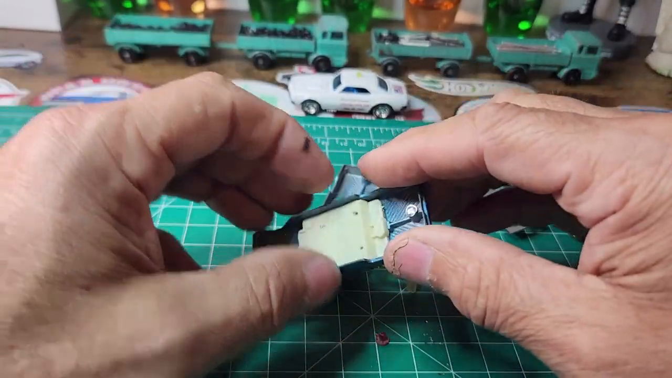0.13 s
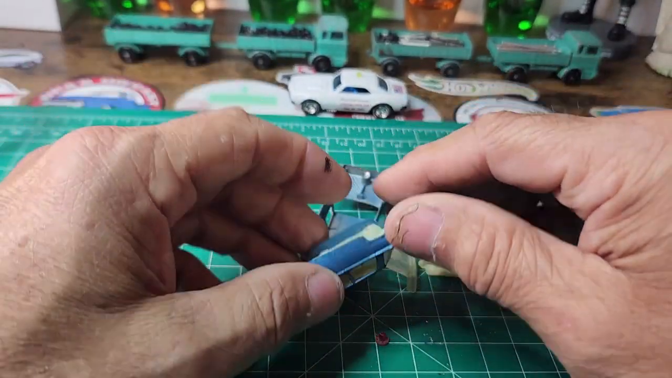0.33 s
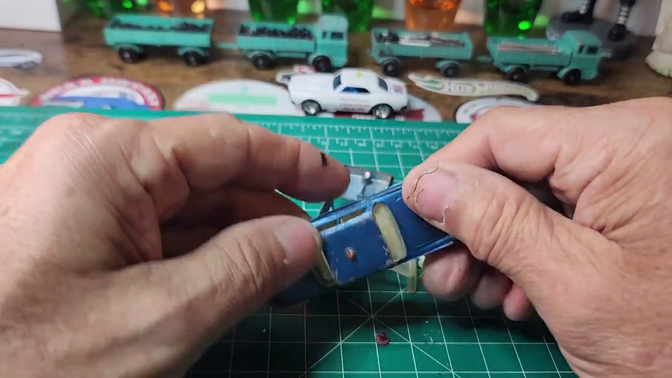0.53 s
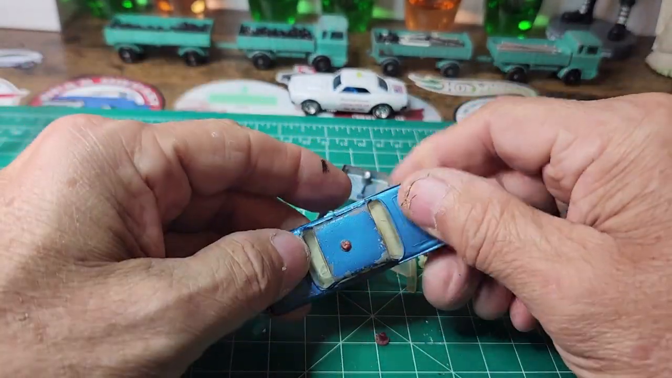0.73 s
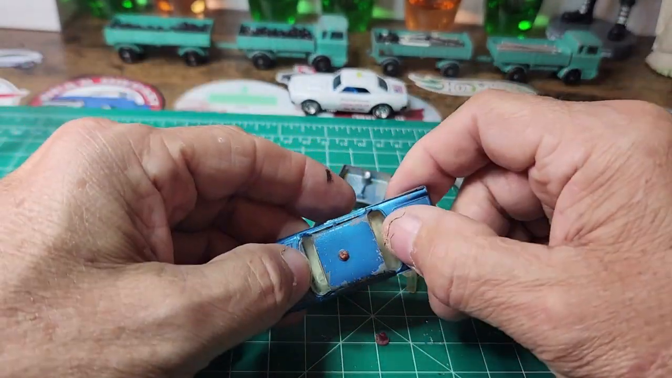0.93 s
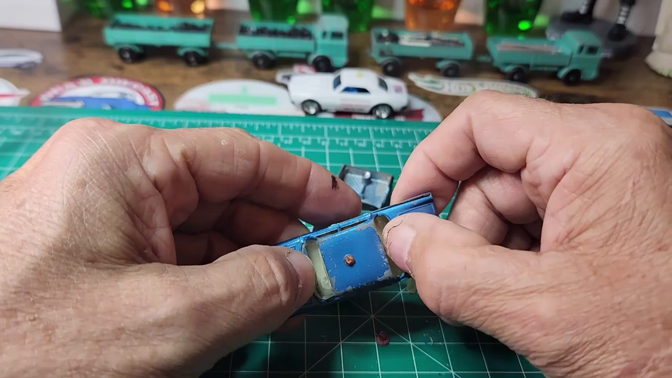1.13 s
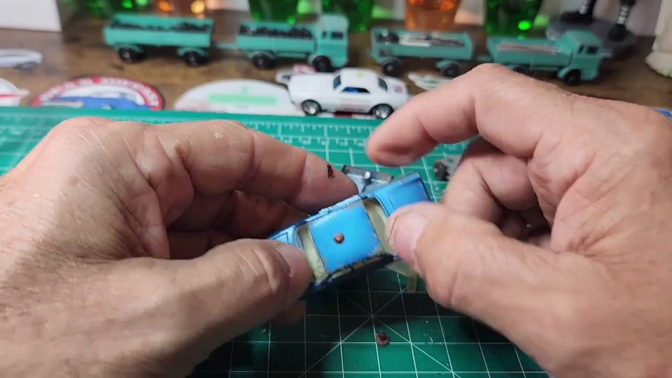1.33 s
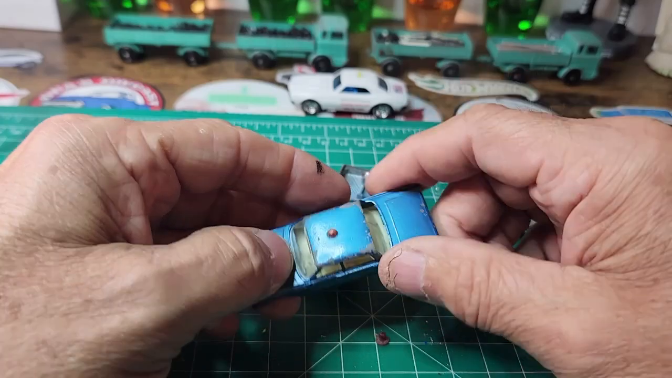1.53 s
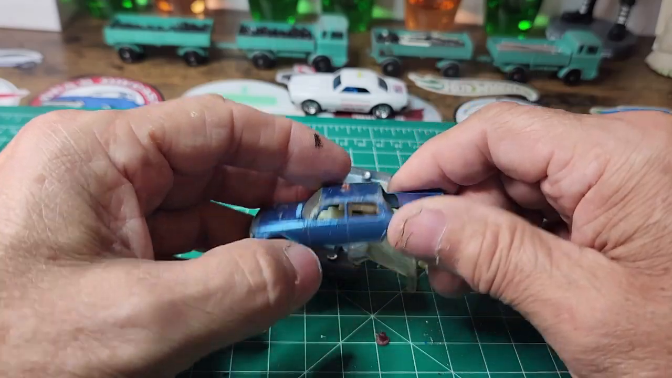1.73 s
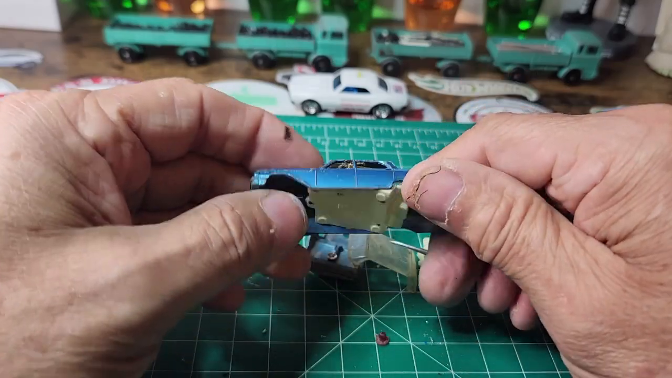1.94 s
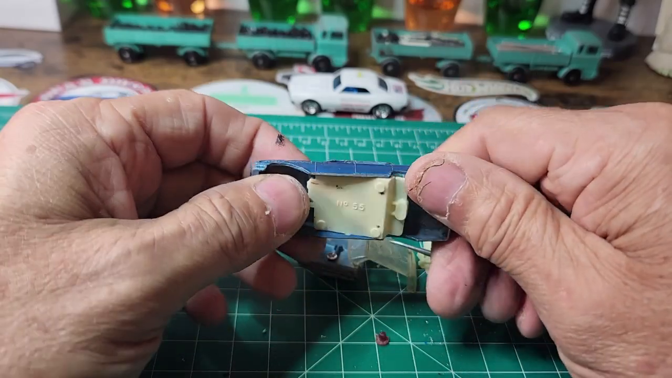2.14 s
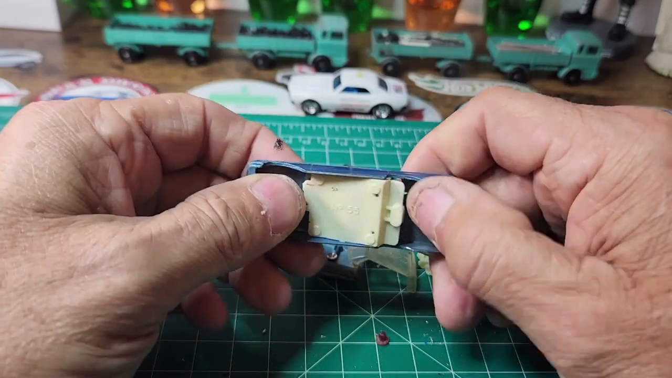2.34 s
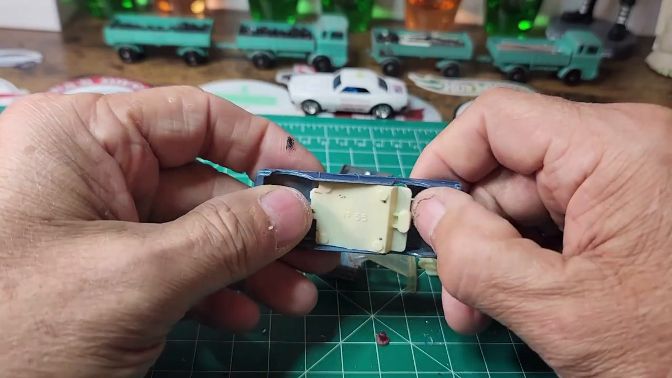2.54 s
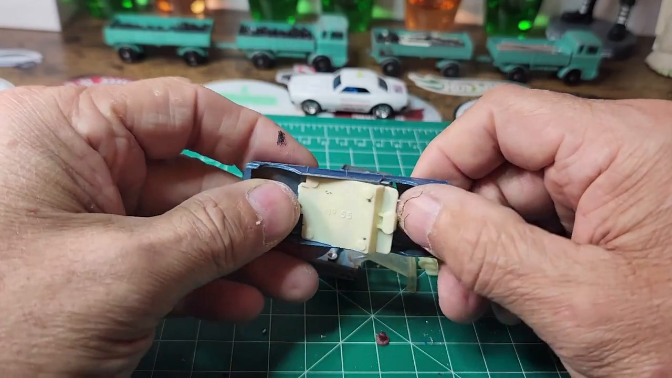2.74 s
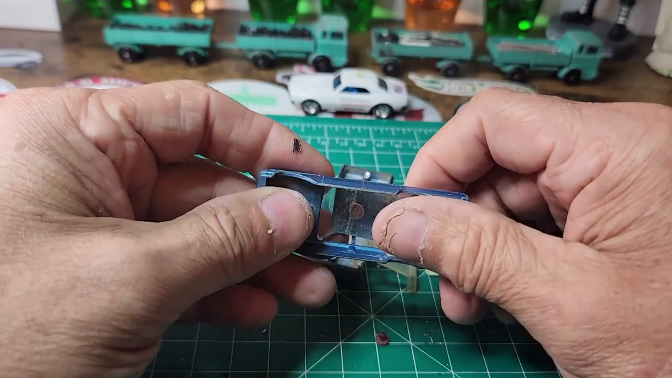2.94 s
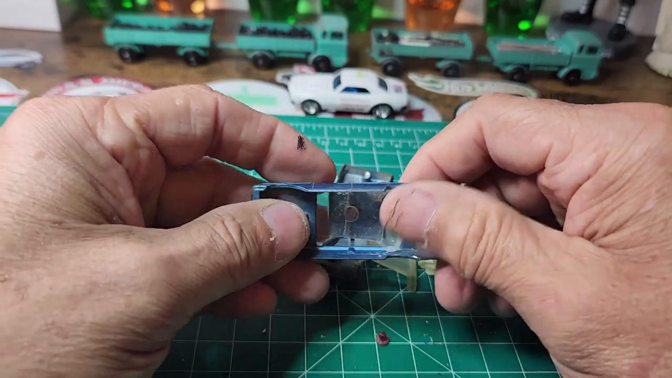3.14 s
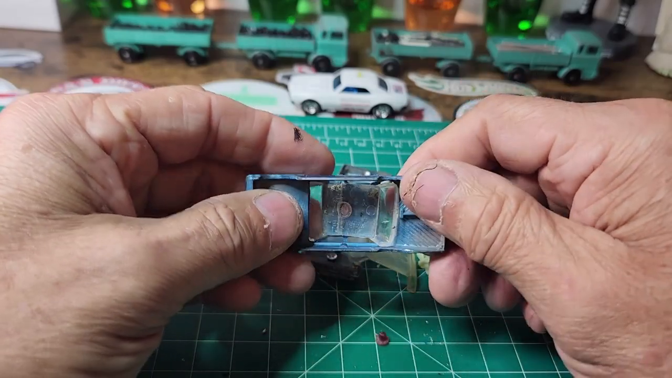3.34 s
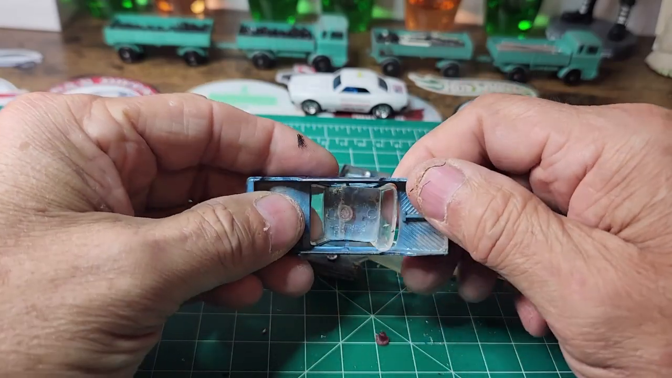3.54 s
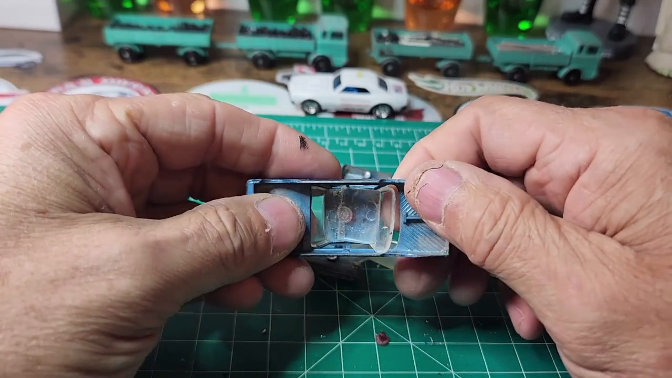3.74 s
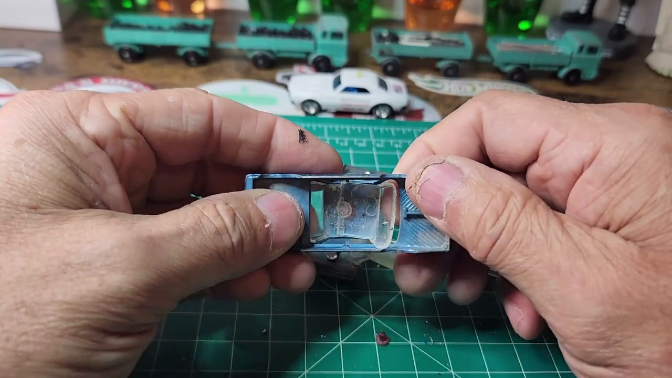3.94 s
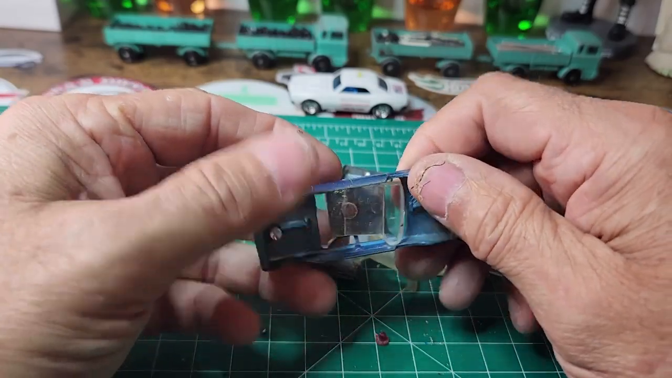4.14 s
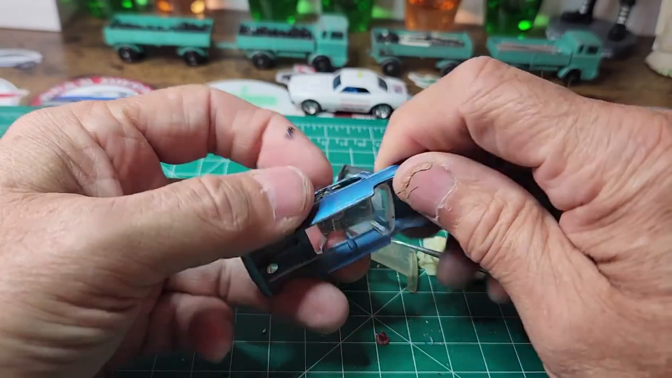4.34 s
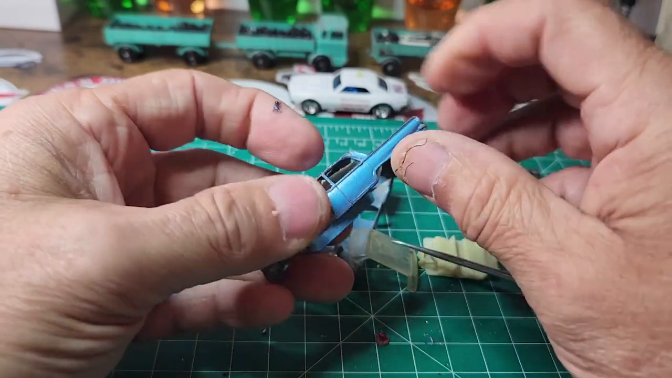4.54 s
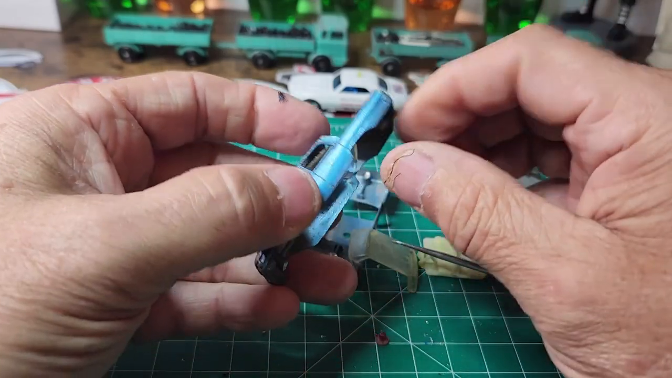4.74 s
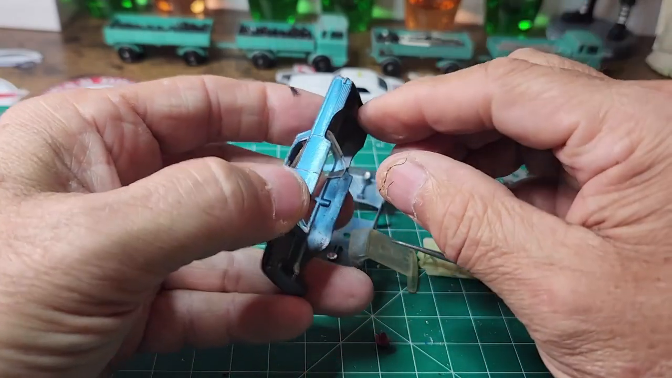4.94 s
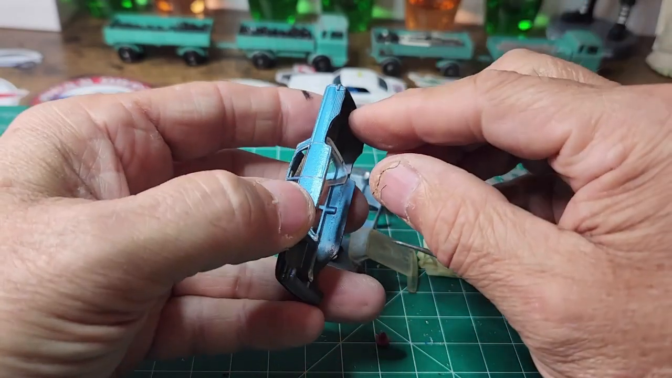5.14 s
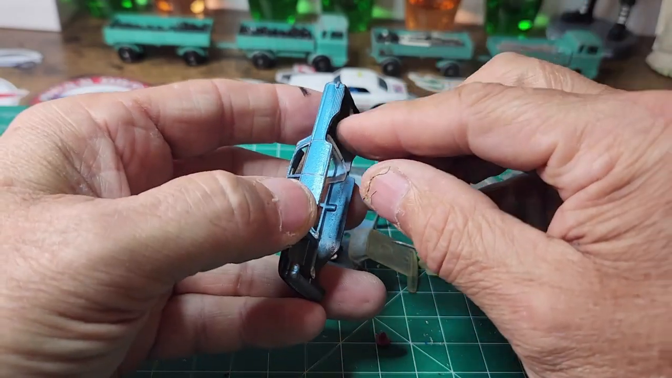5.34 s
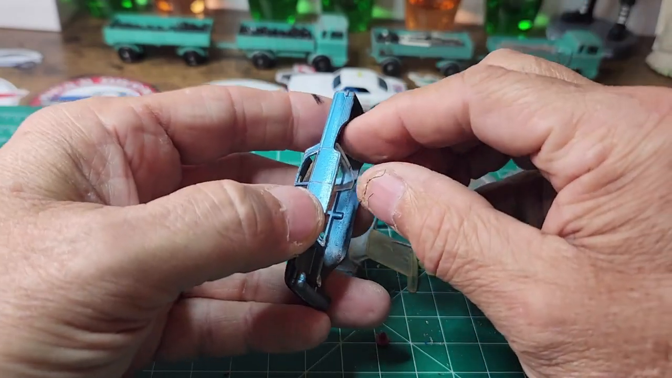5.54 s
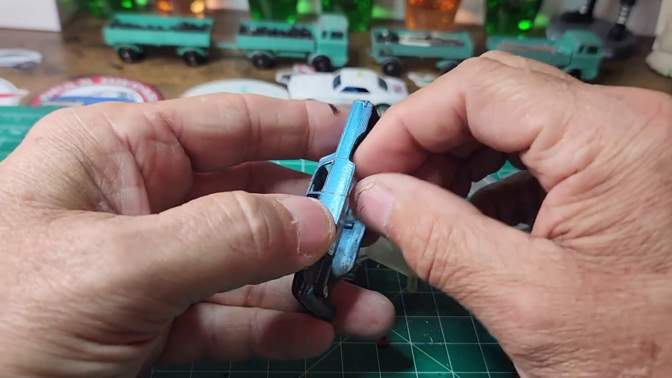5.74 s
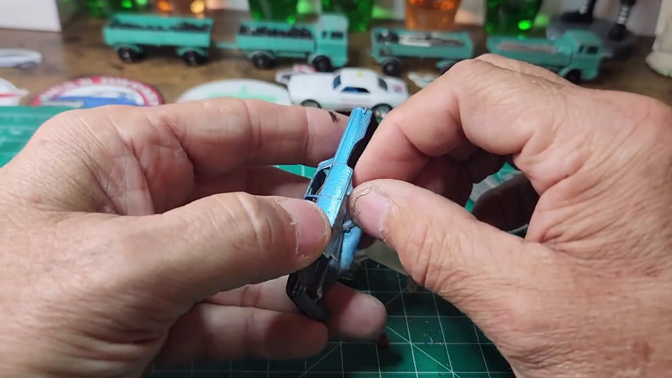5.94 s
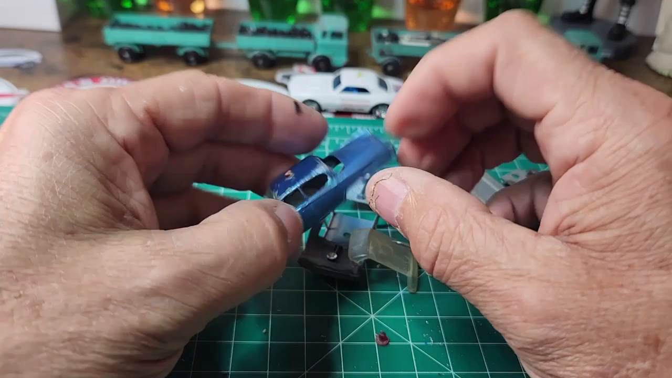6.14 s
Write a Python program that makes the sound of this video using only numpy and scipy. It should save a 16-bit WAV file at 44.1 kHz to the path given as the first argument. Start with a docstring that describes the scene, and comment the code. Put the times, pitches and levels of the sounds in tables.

```python
"""Skin hisses along the metal shell of a small toy car, turned by hands close to a two-port microphone: grains of
noise excite the shell's damped resonances. Loose parts tick against it, each a short burst through resonators.
A plastic insert snaps free, drops on the desk mat, bounces and chatters as it settles; short, mostly low swells
in the desk rumble are decaying sines. A small room answers the contacts with noise tails and hums with
ventilation: shaped noise, narrow motor tones and a swelling desk rumble."""
import sys
import numpy as np
from scipy import signal
from scipy.fft import rfft, irfft, next_fast_len
from scipy.io import wavfile
from scipy.ndimage import uniform_filter1d, map_coordinates

SR = 44100
rng = np.random.default_rng(int(sys.argv[2]) if len(sys.argv) > 2 else 0)


def voltage_ratio(decibels):
    """Convert decibels (scalar or array-like) to amplitude ratios, 20 dB per decade."""
    exponent = np.asarray(decibels, float) / 20
    return 10 ** exponent


def digitize_waveform(pressure):
    """Quantize a signal to 16-bit integers and store it at the path in sys.argv[1].

    Rows of a 2-D input are taken as channels; values are limited to [-1, 1].
    """
    field = np.atleast_2d(pressure).T
    bounded = np.clip(field, -1, 1)
    quanta = np.round(bounded * 32767).astype(np.int16)
    wavfile.write(sys.argv[1], SR, quanta)


N = 272802

# Resonances of the metal shell. Each row: frequency in Hz, width in Hz before added damping, relative level in dB.
SHELL_MODES = [(4700, 300, -3), (6150, 250, -1), (6800, 120, -4), (7380, 120, -2), (7900, 120, -4),
               (8600, 150, -1), (9150, 120, -6), (9880, 130, -2), (10600, 250, -4), (11500, 250, -3),
               (12600, 350, -7), (13700, 250, -8), (14700, 300, -8)]
# Resonances of the plastic insert. Each row: frequency in Hz, width in Hz before added damping, relative level in dB.
INSERT_MODES = [(2400, 230, -13), (3500, 300, 0.5), (4010, 460, -3.5), (5760, 400, -8.5), (6500, 520, -2),
                (7300, 400, -1.5), (8300, 550, -6), (9450, 550, -1.5), (10900, 500, -1.5), (12020, 700, -9),
                (14100, 830, -9)]


def unit(x):
    """Normalization of signal power: scale to rms 1."""
    return x / np.sqrt(np.mean(x ** 2) + 1e-20)


def along(points, hz):
    """Logarithmic frequency scale: (Hz, value) points are joined by straight lines on it."""
    f, v = np.transpose(points)
    return np.interp(np.log(hz + 1), np.log(f + 1), v)


def wobble(rate):
    """Slow random modulation: a smooth curve through random knots, rate of them a second."""
    knots = rng.standard_normal(int(N * rate / SR) + 4)
    return map_coordinates(knots, [np.arange(N) * rate / SR])


def filtered(x, response):
    """Linear filtering: the spectrum is multiplied by a complex response of frequency."""
    m = next_fast_len(x.shape[-1] + 8192)
    spectrum = rfft(x, m) * response(np.fft.rfftfreq(m, 1 / SR))
    return irfft(spectrum, m)[..., :x.shape[-1]]


def mode(f, hz, width):
    """Damped resonance: the causal response of one oscillator, with gain 1 at its peak."""
    return 1j * f * width / (hz * hz - f * f + 1j * f * width)


def rush(response, alike):
    """Partial coherence: stereo noise of rms 1 whose mid and side shares set the channel likeness."""
    def shares(hz):
        turn = np.arccos(np.clip(along(alike, hz), -1, 1)) / 2
        return np.array([np.cos(turn), np.sin(turn)])
    noise = rng.standard_normal((2, N))
    mid, side = filtered(noise, lambda hz: response(hz) * shares(hz))
    return unit(np.array([mid + side, mid - side]))


def patchy(x, patchy_db):
    """Time-frequency modulation: random patches of gain, some hundred Hz wide and some ten ms long."""
    z = signal.stft(x, nperseg=256)[2]
    field = rng.standard_normal(z.shape[1:])
    field = uniform_filter1d(field, size=5, axis=0)
    field = uniform_filter1d(field, size=12, axis=1)
    return signal.istft(z * voltage_ratio(patchy_db * unit(field)), nperseg=256)[1][:, :N]


def ports(x, pan_db, lead):
    """Level and time difference between ports: the right one hears a near source lead seconds later."""
    right = filtered(x[1], lambda hz: np.exp(-2j * np.pi * hz * lead))
    return np.array([x[0] * voltage_ratio(pan_db / 2), right * voltage_ratio(-pan_db / 2)])


def contacts(rows, body, body_db, spread, ring_db, pan_db):
    """Impact excitation: a sharp blow with a rough after-scrape rings its own spot, the body and the desk."""
    # The desk under the mat. Each row: frequency in Hz, width in Hz, relative level in dB.
    mat_modes = [(745, 270, -5), (1086, 130, 0.5), (1700, 500, -5), (2840, 630, 3)]
    lead = 6.2 / SR  # s, the hands are nearer the left port
    out, t = np.zeros((2, N + SR)), np.arange(2048) / SR

    def soft(f):  # contact time rounds off the treble
        return 1 / (1 + 1j * f / 9000) ** 2

    def desk(f):
        return sum((-1) ** k * voltage_ratio(level) * mode(f, c, w) for k, (c, w, level) in enumerate(mat_modes))

    for s, db, hz, knock_db, t60 in rows:
        burst = rng.standard_normal(len(t)) * voltage_ratio(-60 * t / t60) * (1 - np.exp(-t / (0.064 * t60)))
        burst[0] = 0.016 / t60  # the shorter the contact, the more it is one blow
        # each contact excites the modes anew, and each port faces the part differently
        shared_db = rng.normal(0, 2, (len(body), 1, 1))
        port_db = rng.normal(0, 3, (len(body), 2, 1))
        held = voltage_ratio(body_db + shared_db + port_db)

        def rings(f):
            return sum((-1) ** k * gain * voltage_ratio(level) * mode(f, c, w + spread)
                       for k, ((c, w, level), gain) in enumerate(zip(body, held)))

        def struck(f):
            spot = mode(f, hz, 5.6 / t60) + voltage_ratio(ring_db) * mode(f, hz, 170)
            return soft(f) * (spot + rings(f))

        click = filtered(burst, struck)
        knock = filtered(burst, desk)
        sound = click / np.abs(click).max() + voltage_ratio(knock_db + 7.0) * knock / np.abs(knock).max()
        placed = ports(sound, pan_db + rng.normal(), lead * rng.uniform(.9, 1.15))
        out[:, round(s * SR):][:, :len(t)] += voltage_ratio(db) * placed
    return out[:, :N]


def taps():
    """Modal excitation by impact: parts knock the shell, the insert falls, and faint ticks ring the shell."""
    # Parts knock the shell. Each row: start in seconds, click level in dB, strongest ring in Hz,
    # desk knock in dB before a common gain, burst decay time over 60 dB in seconds.
    shell_knocks = [(0.8416, -52.5, 5940, -11, 0.014), (0.8898, -28.5, 6040, -12.5, 0.0052),
                    (0.9231, -37, 6100, -19, 0.0089), (0.9312, -39.5, 2800, -8.5, 0.0099),
                    (0.9506, -33.5, 11050, -15.5, 0.025), (1.0102, -56, 6500, -11, 0.014),
                    (1.0766, -31.5, 9920, -19, 0.008), (1.09, -45, 6240, -9, 0.0073),
                    (1.1018, -38.5, 13000, -18.5, 0.0059), (1.1054, -43, 4470, -12, 0.008),
                    (1.126, -37.5, 12600, -30, 0.007), (1.1305, -44, 6900, -19, 0.0062),
                    (1.1695, -39.5, 9500, -19, 0.007), (1.2178, -44, 5600, -16, 0.007),
                    (1.2885, -52.5, 1430, -11, 0.013), (1.2955, -39.5, 5720, -10, 0.023),
                    (2.6997, -37, 4800, -25.5, 0.016), (2.7796, -24, 3030, -17.5, 0.011),
                    (2.823, -35.5, 7300, -9.5, 0.008), (3.4755, -53, 8120, -16, 0.015),
                    (3.509, -51, 9880, -12, 0.081), (4.0936, -44, 6040, -18, 0.022),
                    (4.778, -39.5, 4490, -28, 0.02), (5.256, -56, 4930, -22, 0.045),
                    (5.5889, -42.5, 8600, -16.5, 0.0143), (5.6869, -31, 10400, -19, 0.008),
                    (5.6895, -38, 8300, -15, 0.016), (5.691, -41.5, 2820, -14, .015),
                    (5.7225, -27, 8680, -17.5, 0.012), (5.7235, -43, 2120, -19, 0.048),
                    (5.7273, -28, 11200, -31, 0.008), (5.7295, -29, 8700, -24.5, .022),
                    (5.732, -45, 2782, -20, 0.04), (5.7425, -38, 6500, -23, 0.021),
                    (5.7657, -39.5, 2760, -38.5, 0.026), (5.7813, -39, 8470, -34, 0.0094),
                    (5.8108, -44.5, 8240, -19.5, 0.024), (6.1424, -42.5, 8000, -16, 0.026)]
    # The insert snaps free, lands and bounces. Each row: start in seconds, click level in dB,
    # strongest ring in Hz, desk knock in dB before a common gain, burst decay time over 60 dB in seconds.
    insert_drop = [(2.9015, -24.5, 5863, -20, 0.0022), (2.9031, 0, 4293, -25, 0.0065),
                   (2.9060, 1, 6590, -23.5, 0.0026), (2.9092, -22.5, 6800, -20, 0.0073),
                   (2.9895, -24.5, 3570, -14, 0.0097), (2.9939, -31, 3552, -16.5, 0.0058),
                   (3.0057, -17, 3490, -17.5, 0.0061), (3.0094, 1.5, 7820, -23.5, 0.00092),
                   (3.0125, -23.5, 6500, -17, 0.009), (3.0205, -27, 7200, -12, 0.0034),
                   (3.0530, -21.5, 3910, -16.5, 0.0054), (3.0655, -16, 3895, -19.5, 0.0025),
                   (3.0672, -21, 6500, -16.5, 0.0075), (3.0855, -23, 6000, -14.5, 0.003),
                   (3.0975, -34, 3510, -12, 0.008)]
    # A faint, nearly even ticking. Each row: start in seconds, click level in dB.
    faint_ticks = [(0.1238, -51.5), (4.567, -66), (4.7145, -62), (4.795, -58.5), (4.858, -60), (4.935, -65),
                   (5.08, -59), (5.1477, -59.5), (5.229, -59), (5.3113, -60)]
    ticks = [(s, db, 7650, -40, .007) for s, db in faint_ticks]
    knocking = contacts(shell_knocks, SHELL_MODES, -12.0, 290, ring_db=-1.5, pan_db=5)
    falling = contacts(insert_drop + rattle(), INSERT_MODES, -2, 500, ring_db=-18, pan_db=3.25)
    ticking = contacts(ticks, SHELL_MODES, -2, 400, ring_db=7, pan_db=-0.5)
    return knocking + falling + ticking


def rattle(count=50):
    """Loss of energy in repeated impacts: random contacts of the settling insert tend to weaken with time."""
    start_s, end_s = 2.911, 3.11
    loudest_db, fade_db, knock_db, t60_s = -24.5, 11.5, -15, 0.0037
    when, size, pick = rng.random((count, 3)).T
    when = when ** 1.2  # denser at the start
    level_db = loudest_db - fade_db * (when + size)
    rows = []
    for w, db, p in zip(when, level_db, pick):
        hz = INSERT_MODES[1 + int(p * len(INSERT_MODES) / 2)][0]  # one of the lower modes
        rows.append((start_s + (end_s - start_s) * w, db, hz, knock_db, t60_s))
    return rows


def rubbing():
    """Friction noise with selective damping: skin slides in fine grains; the grip frees rings near one pitch."""
    # Friction spectrum. Each row: frequency in Hz, relative level in dB per Hz.
    skin_spectrum = [(1500, -120), (2500, -20.5), (4500, -7), (6200, -5.5), (8000, -8), (15000, -10),
                     (17000, -23)]
    level_db, ring_hz = strokes()
    free_hz = uniform_filter1d(ring_hz, size=600)  # a grip holds, then changes quickly
    grain = voltage_ratio(1.1 * wobble(500) + 0.97 * wobble(70)) * rng.standard_normal((2, N))
    skin = unit(filtered(grain, lambda f: voltage_ratio(along(skin_spectrum, f))))
    skin = patchy(skin, patchy_db=4.5)
    high = filtered(skin, lambda f: 1 / (1 + (8000 / (f + 1)) ** 4))
    tilt_db = 7 * np.log2(free_hz / 7500)  # a higher ring comes with a brighter hiss
    sound = voltage_ratio(tilt_db) * high + voltage_ratio(-tilt_db) * (skin - high)
    for hz, width, db in SHELL_MODES:
        octaves_off = np.abs(np.log2(free_hz / hz))
        freed_db = -70 * np.minimum(octaves_off, .17) + 2.8 * wobble(18)
        freed_db += .6 * np.minimum(level_db + 80, 0)  # a light touch hardly rings the shell
        ring = unit(filtered(grain, lambda f: mode(f, hz, width + 95) ** 2))
        sound += voltage_ratio(db - 1.5 + freed_db) * ring
    loud = np.sqrt(np.abs(uniform_filter1d(np.mean(sound ** 2, 0), size=2000)))
    return voltage_ratio(level_db) * voltage_ratio([[1.2], [-1.2]]) * sound / loud


def strokes():
    """Dominance of the strongest excitation: the loudest stroke of the moment sets level and freed ring."""
    # Fingers slide along the shell. Each row: time of the maximum in seconds, level there in dB,
    # swell and fade in seconds over 20 dB, best-freed ring in Hz.
    slides = [(0.057, -64.5, 0.28, 0.1, 4700), (.554, -54.5, 0.11, 0.074, 7450),
              (.655, -62, 0.058, 0.17, 6090), (.74, -65.5, 0.36, 0.18, 7700),
              (1.085, -59.5, 0.057, 0.029, 9300), (1.16, -66, 0.11, 0.11, 9370),
              (1.205, -53.5, 0.021, 0.068, 10900), (1.303, -58, 0.12, 0.068, 5370),
              (1.518, -67.5, 0.17, 0.2, 4700), (1.76, -68.5, 0.1, 0.099, 11500),
              (1.847, -69.5, 0.086, 0.044, 8600), (1.981, -65, 0.14, 0.022, 5770),
              (2.29, -58.5, 0.21, 0.15, 7270), (2.45, -76, 0.22, 0.87, 6900),
              (2.576, -64, 0.032, 0.05, 6900), (3.17, -52.5, 0.097, 0.091, 7070),
              (3.403, -59.5, 0.2, 0.1, 6137), (3.572, -54, 0.019, 0.091, 10220),
              (4.045, -57.5, 0.065, 0.094, 6014), (4.279, -65.5, 0.2, 0.18, 6800),
              (4.529, -69.5, 0.3, 0.15, 6240), (4.637, -67.5, 0.039, 0.058, 4700),
              (4.973, -64.5, 0.095, 0.13, 4700), (5.415, -79, 0.061, 0.094, 4680),
              (5.815, -59, 0.1, 0.054, 8560), (6.04, -60.5, 0.08, 0.29, 7000),
              (6.13, -50, 0.044, 0.042, 9700)]
    # A fingertip loses its grip and skids. Each row: time of the maximum in seconds, level there in dB,
    # fade in seconds over 20 dB, best-freed ring in Hz.
    slips = [(.895, -64, 0.7, 6460), (1.895, -61, 0.04, 7540), (2.685, -61.5, 0.12, 6400),
             (2.781, -53, 0.12, 7300), (4.102, -53, 0.01, 6190), (4.443, -66, 0.4, 6200),
             (4.783, -74.5, 0.7, 8600), (5.673, -50.5, 0.11, 9900), (5.7245, -44, 0.0948, 8600)]
    slip_swell_s, resting_db = 0.0068, -87.5  # a slip starts at once; still fingers
    rounded, pointed = 1.2, 1  # exponents of the stroke's top
    t = np.arange(N) / SR
    level_db, ring_hz = np.full(N, resting_db), np.full(N, 7500.)
    rows = [row + (rounded,) for row in slides]
    rows += [(s, db, slip_swell_s, fade, hz, pointed) for s, db, fade, hz in slips]
    for s, db, swell, fade, hz, bend in rows:
        distance = np.maximum(s - t, 0) / swell + np.maximum(t - s, 0) / fade
        stroke_db = db - 20 * distance ** bend
        ring_hz = np.where(stroke_db > level_db, hz, ring_hz)
        level_db = np.maximum(stroke_db, level_db)
    return level_db, ring_hz


def low_swells():
    """Damped oscillation: each short swell in the desk rumble is a sine that rises once and decays."""
    # Short, mostly low swells. Each row: start in seconds, relative level in dB, frequency in Hz.
    swell_rows = [(1.288, -36, 146), (1.291, -38.5, 640), (1.635, -41, 54.7), (1.685, -43, 54.3),
                  (1.852, -36.5, 64.4), (2.119, -34.5, 60), (2.23, -39.5, 55), (2.857, -40, 60),
                  (2.974, -37, 61), (3.06, -39, 53.6), (3.349, -40, 60)]
    out, t = np.zeros(N + SR), np.arange(SR // 8) / SR
    for s, db, hz in swell_rows:
        cycles = hz * t
        envelope = 2 * cycles * np.exp(-1.3 * cycles)
        out[round(s * SR):][:len(t)] += voltage_ratio(db) * envelope * np.sin(2 * np.pi * cycles)
    return out[:N] * voltage_ratio([[2], [-2]])


def room(x):
    """Reverberant decay: each frequency dies at its own speed; every stretch of sound meets a new tail."""
    # Reverberation. Each row: frequency in Hz, decay time over 60 dB in seconds.
    decay_times = [(500, 0.26), (1600, 0.3), (2800, .17), (4200, 0.19), (11000, 0.12)]
    out, step = np.zeros((2, N + SR)), SR // 10
    for start in range(0, N, step):
        hz, t, z = signal.stft(rng.standard_normal((2, SR // 4)), SR, nperseg=256)
        decay = voltage_ratio(-60 * t / along(decay_times, hz)[:, None])
        tail = signal.istft(z * decay, SR, nperseg=256)[1]
        wet = signal.fftconvolve(x[:, start:start + step], tail / np.linalg.norm(tail[0]), axes=1)
        out[:, start + 90:][:, :wet.shape[1]] += wet  # the tail sets in 90 samples late
    return out[:, :N]


def room_air():
    """Broadband and narrowband noise: steady ventilation with motor tones, over a desk rumble that swells."""
    # Ventilation and hiss. Each row: frequency in Hz, relative level in dB per Hz.
    air_spectrum = [(53, -46), (90, -17.5), (114, -1.5), (155, -12), (189, -12), (268, -11.5), (312, -20.5),
                    (333, -14.5), (472, -15.5), (613, -35), (814, -30.5), (869, -35), (1100, -37),
                    (2000, -39.5), (2700, -47), (3510, -48), (16500, -78.5)]
    # Desk rumble. Each row: frequency in Hz, relative level in dB per Hz.
    rumble_spectrum = [(12, -41.5), (25, -2), (55, 3), (80, -8.5), (110, -24.5), (200, -120)]
    # Motor tones. Each row: frequency in Hz, rms level in dB before panning, resonator width in Hz.
    motor_tones = [(120.3, -61.5, 2.4), (185.8, -63.5, 7.2), (409.3, -65.5, 36), (3520, -84, 220)]
    # Coherence of the ports. Each row: frequency in Hz, left-right likeness (1 is identical).
    likeness = [(60, .9), (130, .96), (290, .87), (640, .6), (1400, 0)]
    air = rush(lambda f: voltage_ratio(along(air_spectrum, f)), likeness)
    air = voltage_ratio(-54.5) * unit(patchy(air, patchy_db=0.68))
    tones = sum(voltage_ratio(db) * rush(lambda f: mode(f, hz, width) ** 2, likeness) for hz, db, width in motor_tones)
    rumble = rush(lambda f: voltage_ratio(along(rumble_spectrum, f)), [(50, .8)])
    rumble = voltage_ratio(-57 + 1.5 * wobble(3)) * rumble
    return (air + tones + rumble) * voltage_ratio([[.6], [-.6]])


def scene():
    """Superposition: contacts with their room tail, rubbing, low swells and the room's air add up."""
    hits = taps()
    return hits + voltage_ratio(-11) * room(hits) + rubbing() + low_swells() + room_air()


def band_limit(x):
    """A steep low-pass at the top of the band."""
    return signal.sosfilt(signal.butter(12, 17000, fs=SR, output="sos"), x)


def record(dry):
    """Saturation and band limiting: peaks bend smoothly toward a ceiling, then the top of the treble is cut."""
    ceiling, top_hz = .9, 16000
    bent = dry / (1 + np.abs(dry / ceiling) ** 4) ** .25
    mix = filtered(bent, lambda hz: hz < top_hz)
    return band_limit(mix)


dry = scene()
out = record(dry)
digitize_waveform(out)
```